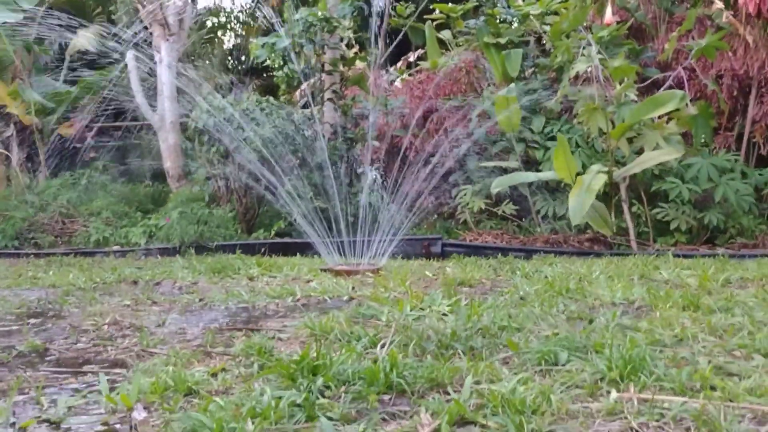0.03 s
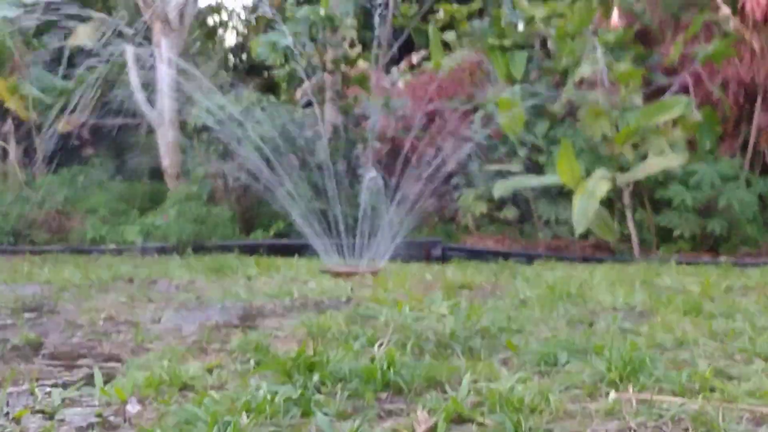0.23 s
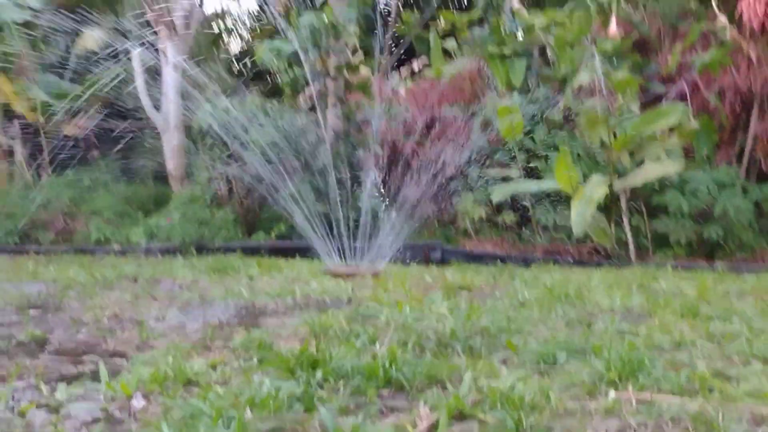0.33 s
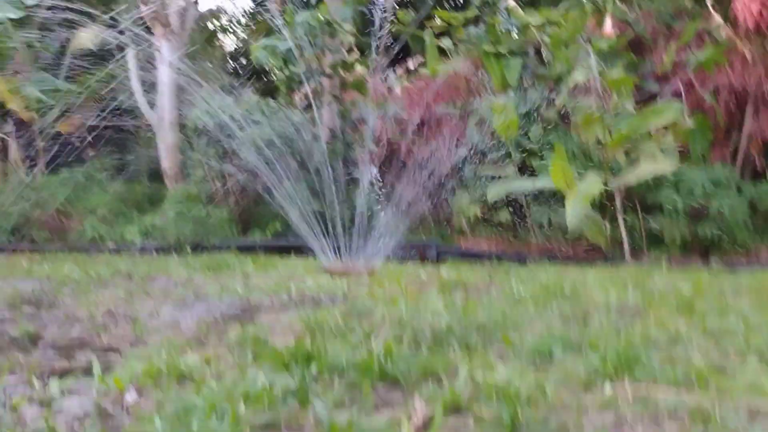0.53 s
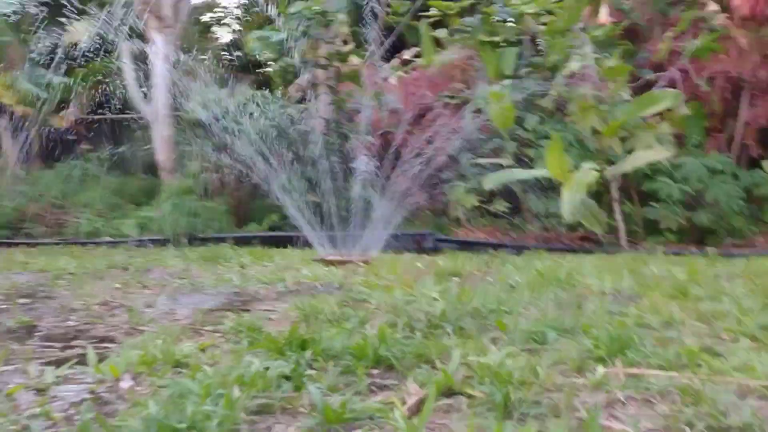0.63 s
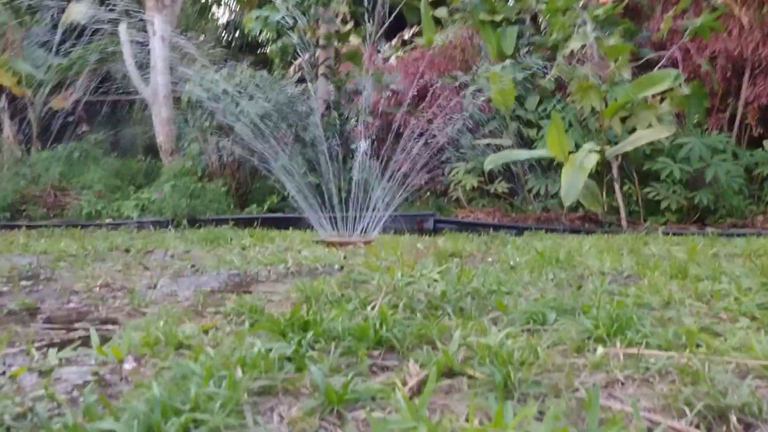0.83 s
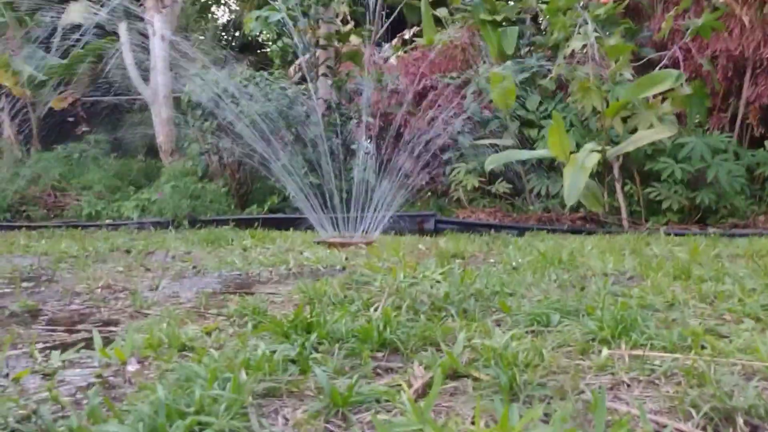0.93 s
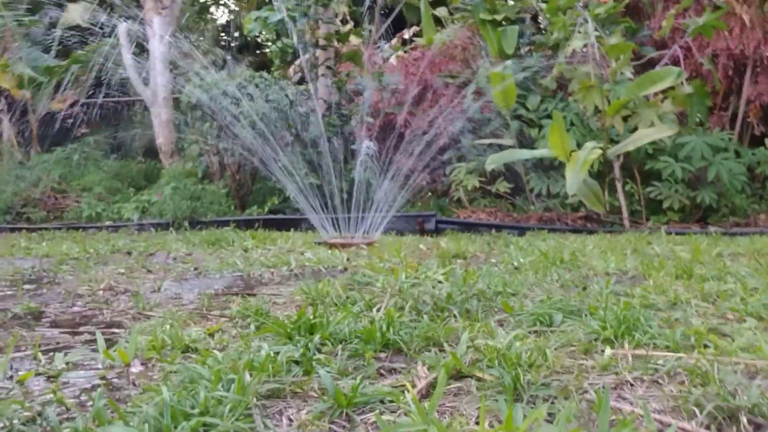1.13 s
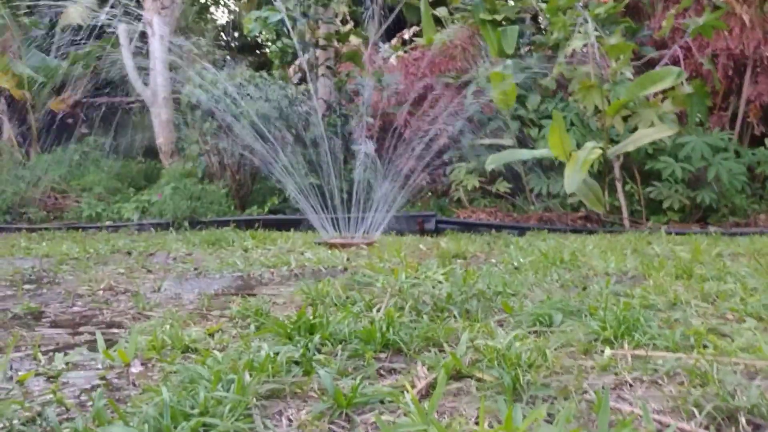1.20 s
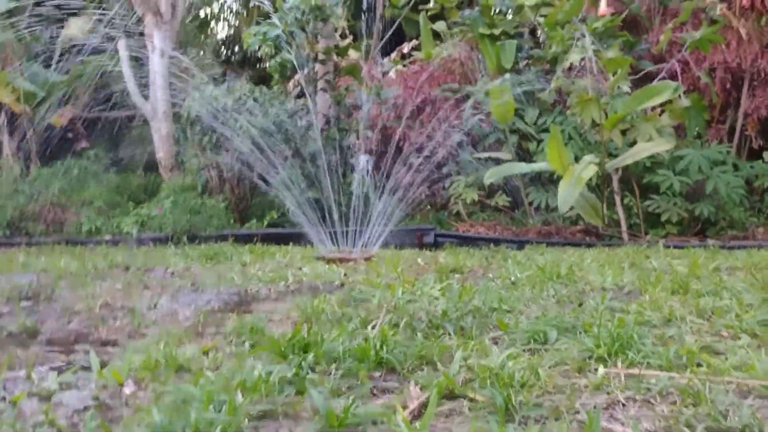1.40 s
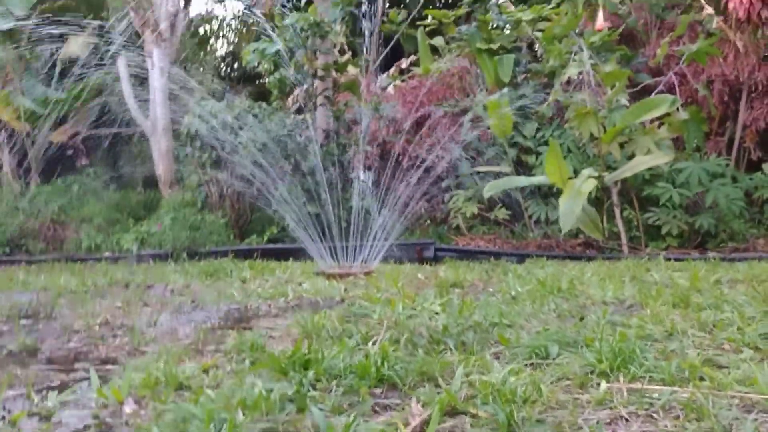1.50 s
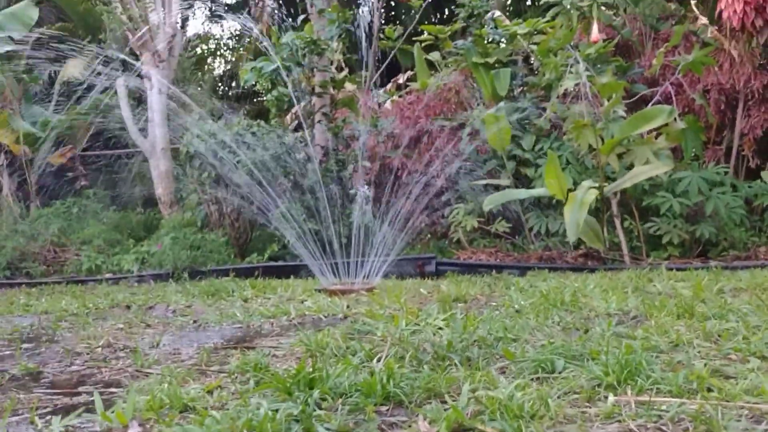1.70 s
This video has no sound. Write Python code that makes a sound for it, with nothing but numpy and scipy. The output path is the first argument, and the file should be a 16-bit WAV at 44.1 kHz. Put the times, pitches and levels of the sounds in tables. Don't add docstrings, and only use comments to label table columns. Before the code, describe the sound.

Lawn sprinkler hissing and pattering on grass, with phone-handling rub, clicks and low outdoor rumble

```python
import sys
import numpy as np
from scipy import signal
from scipy.fft import rfft, irfft
from scipy.io import wavfile
from scipy.ndimage import uniform_filter1d

SR = 44100
rng = np.random.default_rng(int(sys.argv[2]) if len(sys.argv) > 2 else 0)


def boost(x):
    u = np.asarray(x, float) / 20
    return 10 ** u


def materialize(psi):
    bounded = np.clip(np.atleast_2d(psi).T, -1, 1)
    quanta = np.round(bounded * 32767).astype(np.int16)
    wavfile.write(sys.argv[1], SR, quanta)


N = 77175

# time_s, level_db, second_grip_0_to_1
SPRAY_LEVEL = [
    (0, -62.5, 0),
    (.2, -66.5, 0.15),
    (.6, -63, 0.3),
    (1.0, -60.5, 1),
    (1.3, -63.5, 0.78),
    (1.5, -64.5, 0.96),
    (1.75, -66, 0.87),
]
# pitch_hz, left_db, right_db
FIRST_GRIP_TONE = [(565, -10, -5), (1300, -20, -16), (2310, -17, -13.5), (4800, -13.5, 0.5),
                   (6300, -20, -14), (8000, -18, -26), (11100, -22, -27), (15600, -23, -19)]
# pitch_hz, left_db, right_db
SECOND_GRIP_TONE = [(590, -9, -8.5), (1520, -13, -8.5), (2900, -17, 0), (4200, -13.5, -5.5),
                    (5730, -10, -21), (8000, -17.5, -24.5), (10900, -18.5, -20), (15700, -20, -20)]
# time_s, level_db
RUB_LEVEL = [(.4, -83), (.58, -62.5), (.635, -51), (.665, -55.5), (.69, -44.5), (.735, -45.5), (.775, -41),
             (.793, -45.5), (.82, -38.5), (.86, -45.5), (.885, -51.5), (.91, -39.5), (.958, -42.5),
             (.968, -62.5), (1.04, -54.5), (1.08, -64.5), (1.14, -91), (1.25, -100)]
# pitch_hz, left_db, right_db
RUB_TONE = [(490, -15, -12.5), (1080, -14.5, -6), (1720, -8.5, -0.5), (2500, -18.5, 0), (4200, -28, -12),
            (6160, -27.5, -28), (8100, -41, -32), (14700, -59, -46)]
# time_s, pitch_hz, level_db
PRESSED_RESONANCE = [(.62, 5440, 13), (.68, 5700, 19.5), (.72, 5500, 8.5), (.77, 5000, 11.5),
                     (.82, 4000, 5), (.87, 3800, 3), (.93, 3900, -0.5)]
# start_s, rise_s, end_s, level_db, brightness_db_per_octave
BRUSHES = [(.244, 0.004, 0.27, -57, 1), (.285, 0.02, 0.36, -59, -1), (.385, 0.0047, 0.41, -56, 1.5),
           (.417, 0.0033, 0.49, -62.5, -0.5), (.5, 0.0088, 0.562, -52.5, 1.5), (.585, .02, 0.67, -64, 5),
           (.655, 0.0067, 0.71, -45.5, -2.5), (.745, 0.015, 0.767, -48, -3.5),
           (1.21, 0.0086, 1.25, -63.5, -9.5), (1.26, 0.035, 1.37, -66, 7.5), (1.33, 0.031, 1.38, -64, 5)]
# pitch_hz, left_db, right_db
BRUSH_TONE = [(500, -10.5, -17), (1830, 2, 3.5), (3900, -3.5, -7.5), (5400, 1, 1), (6960, -4, -16),
              (8850, -10.5, -23), (15800, -38, -33)]
# start_s, peak_db, pitch_hz, left_minus_right_db
TAPS = [(0.1532, -58.5, 2900, -19), (0.2945, -51, 4000, 6), (0.5549, -38.5, 1920, -11.5),
        (0.64, -56, 2350, -16), (0.9877, -52, 3100, -8), (1.0045, -37.5, 4200, -2.5),
        (1.0996, -54, 2430, -2), (1.1482, -52, 2780, -6), (1.1653, -41, 3530, -14),
        (1.2057, -52, 3940, -12), (1.3353, -52, 3000, -7), (1.3487, -47.5, 2540, -17),
        (1.6785, -53, 3000, -21), (.5585, -44.5, 3680, -15), (.556, -47.5, 1240, -7),
        (.898, -40.5, 5420, 14), (.2468, -51.5, 2470, 10), (.475, -56.5, 1230, -4), (1.011, -51, 1300, -11),
        (.2472, -54, 4200, 6), (.514, -47, 4660, -12), (.536, -49, 5200, -12), (.575, -50, 4630, -12),
        (.597, -44.5, 4800, -12), (.625, -47.5, 4970, -15), (.5555, -43.5, 2500, -4), (.559, -43, 1650, -6),
        (.661, -48, 1600, 13), (.8041, -32, 2900, -14), (.8969, -40, 2930, -8), (.8975, -50, 8000, 12),
        (1.0045, -50, 5640, 5), (1.177, -57, 4300, -9), (1.34, -53.5, 6640, 6), (1.395, -56, 5560, 12),
        (1.571, -57, 3960, -6), (1.572, -69, 6800, 5)]
# start_s, peak_db, pitch_hz, left_minus_right_db
THUDS = [(0.23, -42.5, 186, 3), (.39, -42, 237, 9), (.558, -43.5, 450, 11.5), (0.73, -43, 232, -6),
         (0.36, -47, 130, 10), (.391, -52.5, 510, 10), (.515, -45.5, 520, 4), (1.1, -38.5, 157, 0),
         (1.8, -45.5, 74, 0), (1.5, -42, 101, 3)]
# start_s, peak_db, left_minus_right_db
TICKS = [(0.0648, -56, -2), (0.178, -55.5, 7), (0.2484, -60, 17), (0.4344, -53, -10), (0.5092, -59, 5),
         (0.634, -57, -1.5), (0.6599, -60, 3), (0.756, -49, -3), (0.8564, -40, 7), (0.8798, -43.5, 5),
         (1.0031, -48.5, -2), (1.0383, -47, 7.5), (1.072, -51, 2), (1.2166, -56, 2.0), (1.2476, -57, 2.5),
         (1.2825, -53, -11), (1.3565, -59, 14), (1.5279, -74, -3), (1.5519, -53, 0.0), (1.596, -53.5, 1),
         (1.622, -58, 4), (.027, -63, -5), (.075, -60, 8), (0.163, -61, 3), (.218, -60, -3), (.31, -58, -5),
         (.47, -56, -1), (1.725, -52, 6), (1.157, -61, -9), (1.181, -67, -4), (1.23, -60, -6),
         (1.296, -61, -5), (1.318, -58, -2), (1.383, -55, 13), (1.4, -59, -6), (1.464, -57, -4),
         (1.5, -59, -3), (1.56, -52, -4), (1.695, -64, -2)]
# lowest_hz, highest_hz
FINE_RANGE = [(8800, 13500), (11500, 15600)]
# time_s, level_db, left_minus_right_db
RUMBLE_LEVEL = [(0, -54.5, 1.5), (.15, -54, 0), (.33, -56, 1.5), (.47, -51, -1), (.64, -47, -1.5),
                (.76, -52, 4), (.83, -40.5, -6), (.96, -45.5, 0), (1.05, -48.5, 0), (1.45, -54.5, -0.5),
                (1.75, -56, -2.5)]
# pitch_hz, level_db
RUMBLE_TONE = [(25, -28), (50, -13), (65, -6), (110, -1), (190, 0.4), (290, -7), (420, -16), (800, -25)]
# pitch_hz, likeness_0_to_1
RUMBLE_LIKENESS = [(40, .55), (150, .78), (400, .55), (900, .1)]
# pitch_hz, width_hz, left_db, right_db
PORT_PEAKS = [(770, 70, 2, 3.5), (2800, 260, 0.5, 4), (4074, 330, -3.5, 3.5), (6480, 1160, 5.5, 1),
              (8150, 1050, -1.5, 1), (9370, 900, 5.5, -0.5), (13700, 880, -6.5, 0.5),
              (1650, 650, 1.5, -0.5)]


def read_table(table, x, column=1, log=False):
    rows = np.asarray(table, float)
    if log:
        return np.interp(np.log(x + 1), np.log(rows[:, 0] + 1), rows[:, column])
    return np.interp(x, rows[:, 0], rows[:, column])


def two_port_tone(table, hz):
    under = 5.5 * np.log2(np.clip(hz / table[0][0], 1e-2, 1))
    return under + np.array([read_table(table, hz, column=k, log=True) for k in (1, 2)])


def evened(x):
    return x / np.sqrt(np.mean(x ** 2) + 1e-20)


def grains(per_s, spread_db, smooth):
    octave = np.log2(np.fft.rfftfreq(N, 1 / SR) / 500 + 1e-9).clip(0, 5)
    hit = rng.random((6, 2, N)) < per_s / SR
    size = boost(spread_db * np.minimum(rng.exponential(1, (6, 2, N)), 3))
    trains = hit * size * rng.choice([-1., 1.], (6, 2, N))
    share = np.cos(np.pi / 2 * np.clip(octave - np.arange(6)[:, None, None], -1, 1))
    clicks = irfft((rfft(trains) * share).sum(0), N)
    return np.sqrt(1 - smooth ** 2) * evened(clicks) + smooth * rng.standard_normal((2, N))


def colour(x, field_db, patchy_db, size=512):
    hz, t, z = signal.stft(x, SR, nperseg=size, noverlap=size * 3 // 4)
    patches = uniform_filter1d(rng.standard_normal(z.shape), size=7, axis=1)
    patches = evened(uniform_filter1d(patches, size=9, axis=2))
    z = z * boost(field_db(hz[:, None], t[None]) + patchy_db * patches)
    y = signal.istft(z, SR, nperseg=size, noverlap=size * 3 // 4)[1][:, :N]
    return y / np.sqrt(np.mean(y.mean(0) ** 2))


def spray():
    def field(hz, t):
        grip = np.clip(read_table(SPRAY_LEVEL, t, column=2), 0, 1)
        first = two_port_tone(FIRST_GRIP_TONE, hz)
        return first + grip * (two_port_tone(SECOND_GRIP_TONE, hz) - first)

    level = boost(read_table(SPRAY_LEVEL, np.arange(N) / SR))
    return colour(grains(per_s=700, spread_db=4.5, smooth=.65), field, patchy_db=1.5) * level


def add_hit(mix, start_s, db, side_db, rise_s, wave):
    u = np.arange(wave.shape[1]) / SR / rise_s
    sound = wave * u * np.exp(1 - u) * boost(db + np.array([[side_db / 2], [-side_db / 2]]))
    part = mix[:, round(start_s * SR):][:, :wave.shape[1]]
    part += sound[:, :part.shape[1]]


def ringing_hits(table, cycles, rough):
    mix, t = np.zeros((2, N)), np.arange(800) / SR
    for start_s, db, hz, side_db in table:
        wobble = rng.standard_normal((2, 800))
        for _ in range(3):
            wobble = uniform_filter1d(wobble, size=24)
        wave = np.sin(2 * np.pi * hz * t + rough * evened(wobble))
        add_hit(mix, start_s, db - 0.5, side_db, cycles / hz / 3, wave)
    return mix


def ringing_drops():
    return ringing_hits(TAPS, cycles=4.1, rough=.45)


def fine_drops():
    fine = np.zeros((2, N))
    for start_s, db, side_db in TICKS:
        add_hit(fine, start_s, db + 0.37, side_db, .0024 / 3, rng.standard_normal((2, 800)))
    patter_per_s, patter_db = 71, -92
    size_db = patter_db + 23.0 + 2.7 * rng.exponential(1, N).clip(0, 3)
    size = (rng.random(N) < patter_per_s / SR) * boost(size_db)
    fade = np.exp(-np.arange(300) / SR / 0.0016)
    fine += signal.oaconvolve(size, fade)[:N] * rng.standard_normal((2, N))
    ports = []
    for band, x in zip(FINE_RANGE, fine):
        ports.append(signal.sosfilt(signal.butter(2, band, "band", fs=SR, output="sos"), x))
    return np.array(ports)


def rub():
    def field(hz, t):
        early = np.clip((.8 - t) / 0.061, 0, 1)
        start_dip = -4.0 * np.exp(-((hz - 1000) / 350) ** 2) - 4.2 * np.exp(-((hz - 3800) / 600) ** 2)
        air = np.exp(-((hz - 13800) / 3200) ** 2 - ((t - .68) / .13) ** 2)
        body = 11.1 * np.exp(-((hz - 750) / 90) ** 2 - ((t - .77) / 0.056) ** 2)
        near_peak = np.exp(-((hz - read_table(PRESSED_RESONANCE, t)) / 900) ** 2)
        pressed = read_table(PRESSED_RESONANCE, t, column=2) * near_peak
        uneven = np.array([[[3.]], [[19.0]]]) * air + np.array([[[.4]], [[1]]]) * pressed
        return two_port_tone(RUB_TONE, hz) + uneven + body + early * start_dip

    level = boost(read_table(RUB_LEVEL, np.arange(N) / SR))
    return colour(grains(per_s=2600, spread_db=2.0, smooth=.75), field, patchy_db=1.2) * level


def brushes():
    def field(hz, t):
        tilt = read_table(BRUSHES, t, column=4)
        return two_port_tone(BRUSH_TONE, hz) + tilt * np.log2(np.maximum(hz, 300) / 4000)

    t, strokes = np.arange(N) / SR, np.zeros(N)
    for start, rise, end, db, _ in BRUSHES:
        sag_db = -7 * np.clip((t - start) / (end - start), 0, 1)
        swell = np.clip((t - start) / rise, 0, 1)
        lift = np.exp(-np.maximum(t - end, 0) / .009)
        strokes += boost(db + sag_db) * swell * lift
    return colour(grains(per_s=1500, spread_db=3.5, smooth=.7), field, patchy_db=2.5) * strokes


def hand_thuds():
    return ringing_hits(THUDS, cycles=1.5, rough=.1)


def rumble():
    t, hz = np.arange(N) / SR, np.fft.rfftfreq(N, 1 / SR)
    a, b = rfft(rng.standard_normal((2, N)))
    same = np.clip(read_table(RUMBLE_LIKENESS, hz, log=True), -1, 1)
    high_fall = -20.0 * np.log2(np.maximum(hz / 900, 1))
    low_fall = 18.0 * np.log2(np.clip(hz / 25, 1e-3, 1))
    tone = boost(read_table(RUMBLE_TONE, hz, log=True) + high_fall + low_fall)
    z = tone * np.array([a, same * a + np.sqrt(1 - same ** 2) * b])
    deep = 1 / (1 + (hz / 114) ** 4)
    level_db = read_table(RUMBLE_LEVEL, t)
    lag = boost((0.39 - 1) * (level_db + 48.5))
    low = (irfft(z * (1 - deep), N) + lag * irfft(z * deep, N)) / irfft(z, N).std()
    side = read_table(RUMBLE_LEVEL, t, column=2) / 2
    return low * boost(level_db + np.array([side, -side]))


def scene():
    water = spray() + ringing_drops() + fine_drops()
    hand = rub() + brushes() + hand_thuds()
    return water + hand + rumble()


def band_limit(x):
    return signal.sosfilt(signal.butter(12, 15730, fs=SR, output="sos"), x)


def record(dry):
    hz = np.fft.rfftfreq(N, 1 / SR)
    peaks_db = np.zeros((2, len(hz)))
    for centre, width, left_db, right_db in PORT_PEAKS:
        peaks_db += np.array([[left_db], [right_db]]) / (1 + ((hz - centre) / width * 2) ** 2)
    rounded = .13 * np.tanh(dry / .13)
    mix = irfft(rfft(rounded) * boost(peaks_db) * (hz < 15730), N)
    return band_limit(mix)


dry = scene()
out = record(dry)
materialize(out)
```